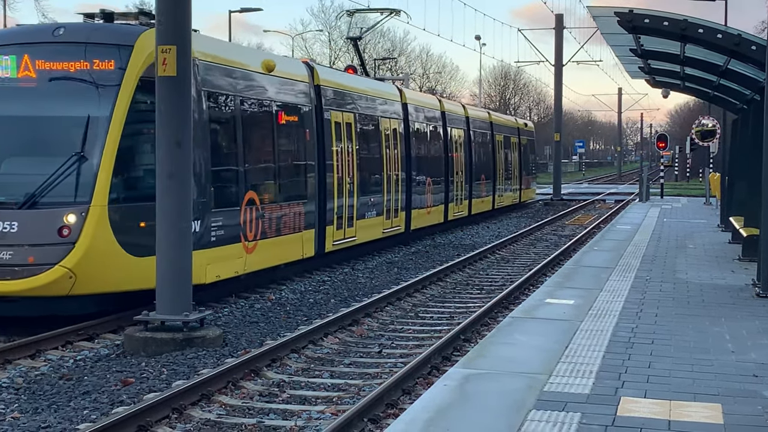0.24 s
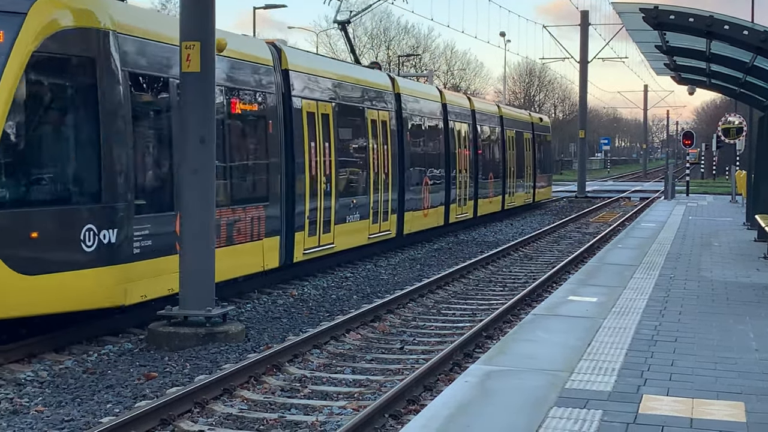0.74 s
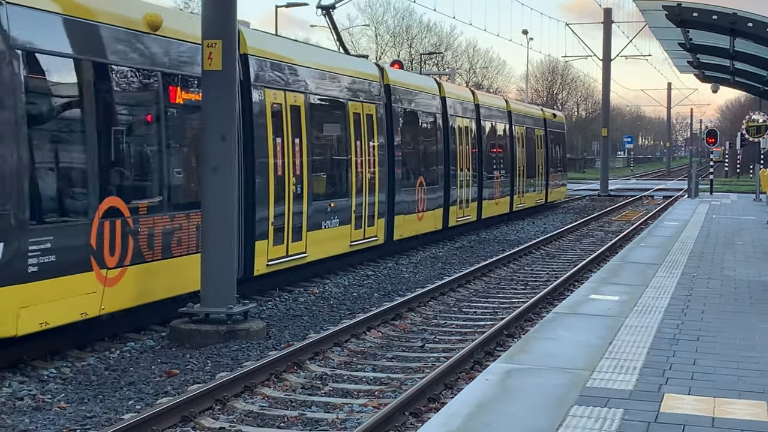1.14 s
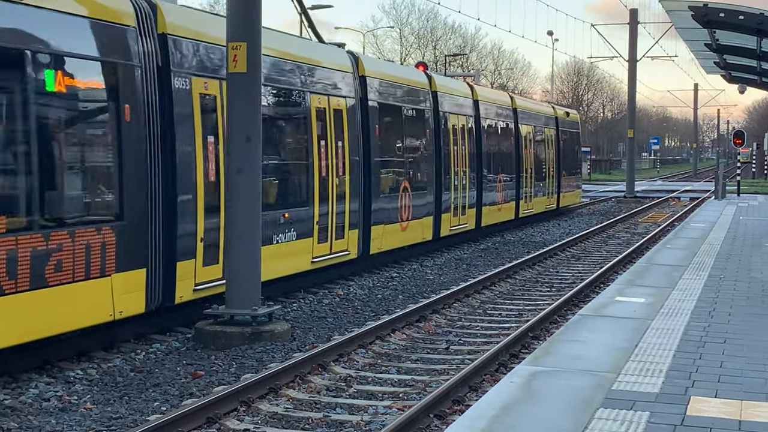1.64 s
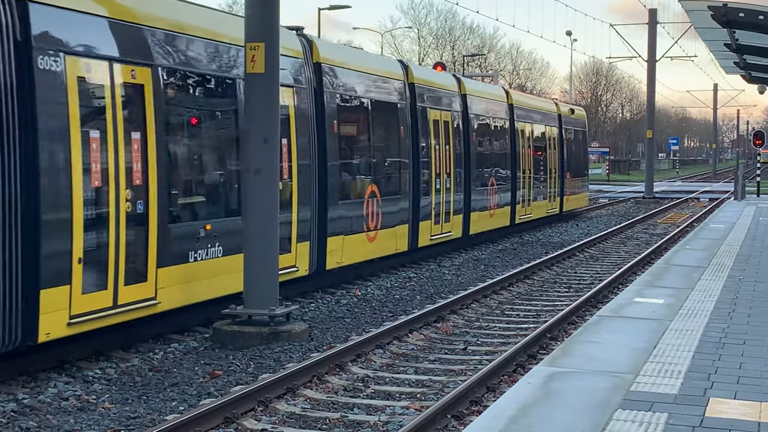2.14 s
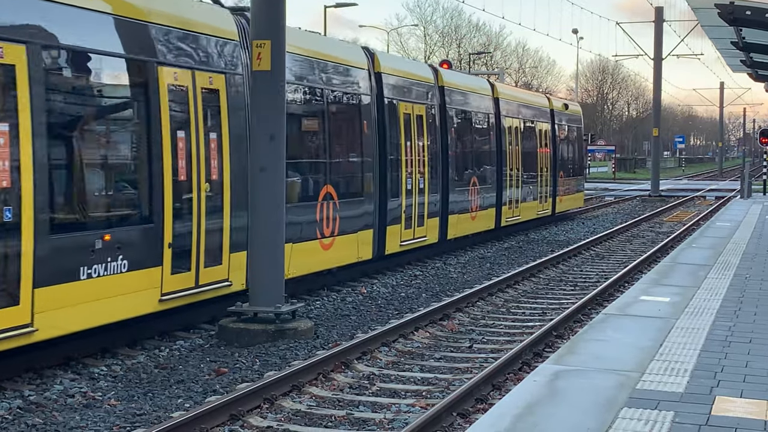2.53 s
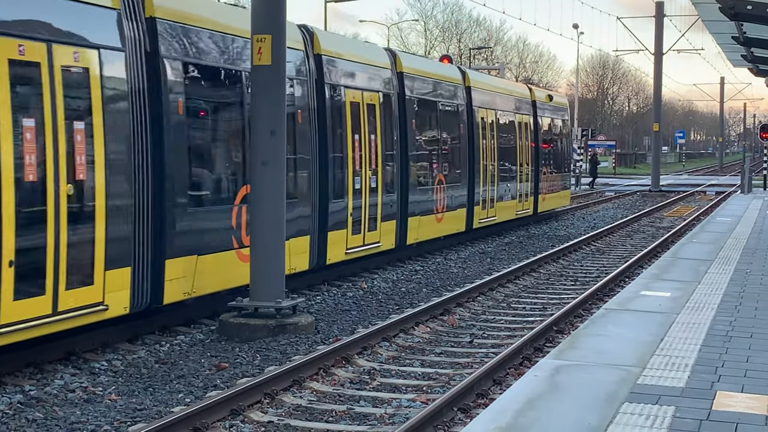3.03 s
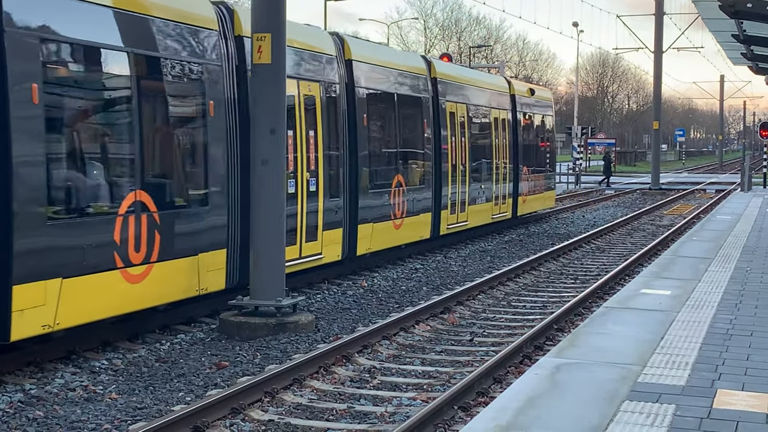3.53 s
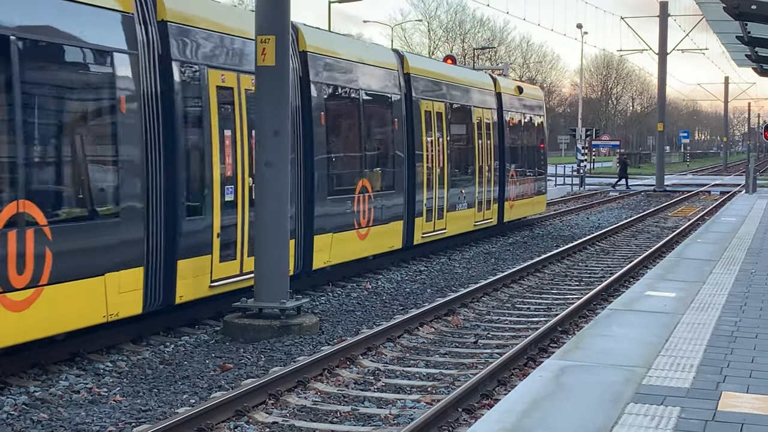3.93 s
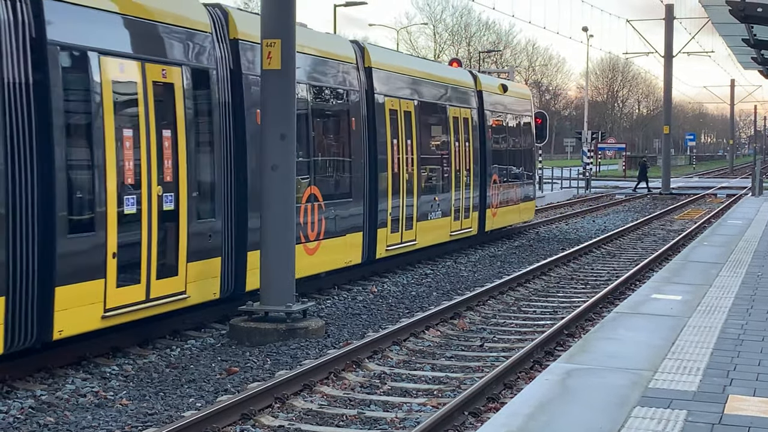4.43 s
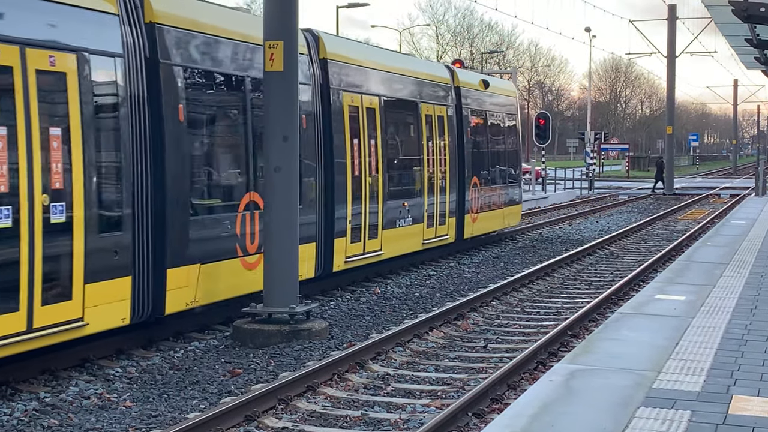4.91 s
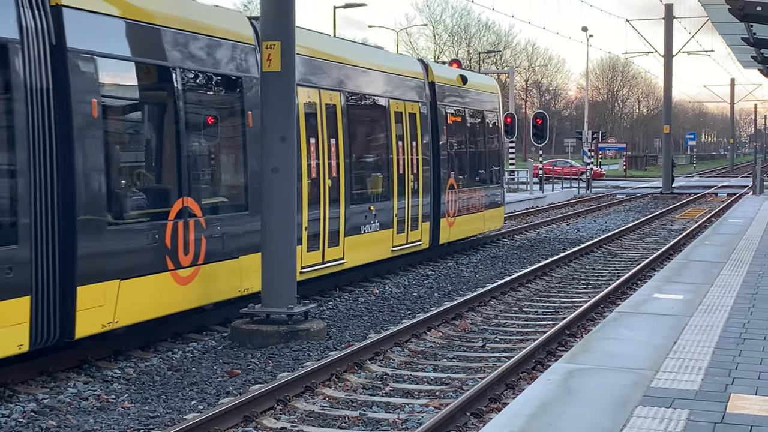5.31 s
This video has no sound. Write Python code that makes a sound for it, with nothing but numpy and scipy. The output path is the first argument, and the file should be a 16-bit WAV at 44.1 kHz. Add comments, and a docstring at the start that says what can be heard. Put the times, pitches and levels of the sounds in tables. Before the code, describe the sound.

Outdoors beside a tram stop, a close stereo phone microphone hears a tram roll past. Rumble and rail roar build with soft thuds and a rough electric whine. Around three seconds wheel knocks peak, with a faint flange squeal. Hiss and small ticks follow; the whine sags, gives way to a thinner, higher one, and a low hum comes forward.

```python
"""Slow tram past a platform

A tram rolls by, a few metres from a phone held level. Rough wheels shake ground, floor and rail as
coloured noise; bogies, brake levers and rail ring as struck modes. Motor inverters whine as smeared
tones and step up in pitch as the tram slows; gears hum, a flange sings, the brakes hiss and tick."""
import sys
import numpy as np
from scipy import signal
from scipy.fft import rfft, irfft
from scipy.io import wavfile
from scipy.ndimage import uniform_filter1d

SR = 44100
rng = np.random.default_rng(int(sys.argv[2]) if len(sys.argv) > 2 else 0)


def persist_wave(psi):
    """Save psi, clipped to +-1, as 16-bit WAV."""
    counts = np.round(np.clip(psi, -1, 1) * 32767).astype(np.int16)
    wavfile.write(sys.argv[1], SR, np.atleast_2d(counts).T)


N = 245194

# loudness of the passing bogies: time_s, bass_db, treble_db, top_hiss_db
PASS_BY = [(0, -15, -5.5, -10), (.3, -12.5, -5.5, -11), (1.0, -8, -2.5, -8), (1.45, -10, -2, -6.5),
           (2.1, -5.5, -1, -1), (2.65, -1, -.5, 0), (3.1, -2.5, -0.5, -0.5), (3.4, -1.5, -1, 3),
           (3.65, -4.5, -0.5, -1), (4.2, -2.5, -1.5, -4), (4.45, -4, -1, -8), (4.65, -5, -1.5, -12),
           (4.9, -8.5, -2, -9), (5.25, -4.5, -2.5, -6), (5.56, -5.5, -4, -7)]
# noise colours, relative density: freq_hz, density_db
GROUND_COLOUR = [(20, -30), (30, -18), (45, -5), (65, 1.5), (85, -0.5), (120, -29)]
BOOM_COLOUR = [(55, -9), (80, -8), (104, 9.5), (125, 5.5), (150, 1), (200, -2.5)]
RUMBLE_COLOUR = [(90, -71), (135, 0), (165, -0.5), (210, 3), (260, -5), (340, -16)]
DRONE_COLOUR = [(190, -7), (260, -1.5), (310, -0.5), (380, -1), (470, -15), (700, -36.5)]


def wheel_rumble():
    """Wheel roughness shakes ground, floor and running gear; thuds add power to ground and boom."""
    bass_db, _, _ = track(PASS_BY)
    boom_power, ground_power = thuds()
    ground_gain = np.sqrt(undb(-45) ** 2 + ground_power)
    boom_gain = np.sqrt(follow(-39, 0.53, bass_db) ** 2 + boom_power)
    ground = ground_gain * noise(GROUND_COLOUR, flicker_db=0.2, rate_hz=2.6)
    boom = boom_gain * noise(BOOM_COLOUR, flicker_db=0.82, rate_hz=15)
    rumble = follow(-33.5, 0.92, bass_db) * noise(RUMBLE_COLOUR, flicker_db=2.37, rate_hz=13)
    drone = follow(-35, 0.79, bass_db) * noise(DRONE_COLOUR, flicker_db=1.26, rate_hz=10)
    return ground + boom + rumble + drone


# soft thuds: peak_s, boom_db, ground_db
THUD_EVENTS = [(.2, -42, -55), (.63, -34, -45), (.86, -40.5, -33), (.98, -42, -35), (1.57, -37.5, -33),
               (1.68, -37, -40.5), (1.9, -46, -32), (1.99, -47, -35.5), (2.23, -34.5, -38.5),
               (2.66, -32.5, -57), (2.85, -55, -37.5), (3.06, -32.5, -38), (3.42, -30, -55),
               (3.82, -30.5, -54), (4.16, -33, -50), (4.28, -41, -52), (4.5, -34.5, -37.5),
               (4.679, -35, -34), (4.82, -56, -41), (5.02, -35.5, -34.5), (5.2, -36.5, -35.5),
               (5.45, -44, -44)]


def thuds():
    """Each thud swells and dies exponentially; returns floor boom power and ground shake power."""
    rise_s, fall_s = 0.058, 0.082  # amplitude time constants
    peak_s, *levels_db = np.transpose(THUD_EVENTS)[:, :, None]
    late_s = np.arange(N) / SR - peak_s
    decay = np.where(late_s < 0, -late_s / rise_s, late_s / fall_s)
    power = np.exp(-2 * decay)
    return [(undb(db) ** 2 * power).sum(axis=0) for db in levels_db]


# noise colours, relative density: freq_hz, density_db
ROAR_COLOUR = [(350, -19), (500, -3.5), (720, -7.5), (870, 2.5), (1050, -6.5), (1500, -8.5), (2000, -11.5),
               (2600, -26.5)]
SIZZLE_COLOUR = [(1300, -39), (2000, -0.5), (2700, -1), (3100, -2.5), (3300, -3.5), (3700, -4),
                 (4600, -10.5), (5500, -20.5)]


def rail_roar():
    """Wheel roughness shakes the rail: a midrange roar and a brighter sizzle."""
    _, treble_db, _ = track(PASS_BY)
    roar = follow(-42.5, 0.58, treble_db) * noise(ROAR_COLOUR, flicker_db=0.86, rate_hz=12)
    sizzle = follow(-48.5, 1, treble_db) * noise(SIZZLE_COLOUR, flicker_db=0.76, rate_hz=20)
    return roar + sizzle


def inverters():
    """The inverters whine, with a lower side band; later a higher, tidier pair joins."""
    return fast_whine() + lower_side_band() + creep_whine()


# inverters at speed: time_s, nominal_hz, level_db, octave_db, skirt_db
WHINE_TRACK = [(0.0, 2008, -51, -63, -3), (0.45, 2051, -51.5, -65.5, -4.5), (0.71, 2043, -47, -60, -2.5),
               (1.02, 2001, -46.5, -61.5, -3), (1.3, 2056, -47.5, -63, -5), (1.5, 2060, -45, -63, -7),
               (1.64, 2053, -45, -59, -7), (1.7, 2045, -54, -58.5, -9), (1.8, 2042, -46, -57, -10.5),
               (1.9, 2058, -49, -56, -7), (2.08, 2006, -49, -53, -9), (2.25, 2024, -49, -52, -5),
               (2.5, 1973, -43, -50, -1), (2.76, 2027, -41, -52.5, -6.5), (2.96, 2045, -44.5, -53, -2.5),
               (3.14, 2016, -41.5, -50.5, -3), (3.34, 2051, -42.5, -52.5, -4.5),
               (3.58, 2040, -39.5, -52.5, -5.5), (3.72, 2048, -45.5, -57, -5), (3.82, 2035, -40, -55, -5.5),
               (3.95, 1993, -47, -52.5, -4), (4.1, 1983, -45, -54.5, 1), (4.4, 1928, -43.5, -56, -4),
               (4.52, 1905, -43.5, -55.5, 0.5), (4.62, 2014, -52, -67, -2), (5.56, 2052, -54, -72, -3)]


def fast_whine():
    """A ragged core between side bands, with a blurred octave."""
    hz, level_db, octave_db, skirt_db = track(WHINE_TRACK)
    skirt = wavering(.97 * hz, 325) + undb(-3.0) * wavering(1.11 * hz, 320)
    core_hz = hz * (1.01 + .004 * walk(18))
    core = undb(1.2 * walk(25)) * wavering(core_hz, 72, steady=.55)
    base = undb(-8.0 - skirt_db) * core + undb(skirt_db - 4.0) * skirt
    octave = undb(-1.0) * wavering(1.98 * hz, 700)
    for ratio in (1.9, 1.97, 2.06):
        strand_hz = hz * (ratio + .022 * walk(22))
        octave = octave + undb(-6 + 1.5 * walk(20)) * wavering(strand_hz, 130, steady=.2)
    base_gain = undb(level_db + 0.48 * walk(15))
    octave_gain = undb(octave_db - 0.9 + 0.67 * walk(25.1))
    return base_gain * base + octave_gain * octave


# lower side band of the whine: time_s, nominal_hz, level_db
LOW_WHINE_TRACK = [(0.0, 1850, -55), (0.62, 1825, -63), (0.96, 1840, -54), (1.56, 1856, -54),
                   (1.59, 1870, -48.5), (2.01, 1860, -55), (2.46, 1857, -48.5), (2.48, 1849, -45.5),
                   (3.45, 1871, -50), (3.51, 1799, -38), (3.59, 1895, -54), (3.63, 1867, -43),
                   (3.67, 1838, -49), (4.37, 1862, -46.5), (4.41, 1847, -41), (4.62, 1880, -59)]


def lower_side_band():
    """A lower side band, wandering in pitch and level until its track ends."""
    hz, level_db = track(LOW_WHINE_TRACK)
    gain = undb(level_db - 3.0 + 2.0 * walk(14))
    tone = wavering(hz * (1 + .012 * walk(10)), 108)
    return gain * tone * (np.arange(N) / SR < LOW_WHINE_TRACK[-1][0])


# inverters when slow: time_s, base_db, octave_db
CREEP_TRACK = [(4.5, -57, -72), (4.62, -54.5, -69), (4.76, -58, -69), (4.92, -57.5, -66.5),
               (5.1, -55.5, -62), (5.22, -62, -63), (5.38, -57, -60), (5.45, -58, -58), (5.56, -66, -66)]


def creep_whine():
    """Slow-speed switching near 3 kHz and its octave, from the start of the track."""
    base_db, octave_db = track(CREEP_TRACK)
    hz = 3016 * (1 + .003 * walk(25))
    sway = 1 + .006 * walk(14)
    base = undb(base_db + 1.2 * walk(16)) * wavering(hz * sway, 100, steady=.4)
    octave = undb(octave_db) * wavering(2 * hz, 120, steady=.5)
    return (base + octave) * (np.arange(N) / SR > CREEP_TRACK[0][0])


# wheel knocks: start_s, peak_db
KNOCK_EVENTS = [(.347, -28.5), (.942, -34), (.977, -29.5), (1.537, -26.5), (1.927, -34), (2.632, -22),
                (2.657, -26.5), (2.915, -22), (3.013, -24), (3.0195, -12), (3.17, -24), (3.335, -27),
                (3.402, -22), (3.78, -28), (4.15, -31)]
# bogie modes: freq_hz, level_db, t60_s
BOGIE_MODES = [(115, -9, .08), (168, -2, .085), (195, -3, .085), (255, -12, .04), (320, -1, .07),
               (360, 2, .075), (450, -8, .05), (540, -12, .04), (640, -19, .03)]


def wheel_knocks():
    """Wheel blows ring the low modes of the bogie."""
    return strike(KNOCK_EVENTS, BOGIE_MODES, push_s=0.00388, spread=.04)


# gear hum: time_s, pitch_hz, level_db
HUM_TRACK = [(0, 224, -52), (1.5, 222, -51), (2.5, 221, -53), (4.66, 220, -53), (4.75, 220, -39.5),
             (5.1, 219, -38.5), (5.56, 218, -39)]


def gears():
    """The gear mesh hums, nearly a pure tone."""
    hz, level_db = track(HUM_TRACK)
    return undb(level_db) * wavering(hz, 7, steady=3.5)


# metal ticks: start_s, peak_db
TICK_EVENTS = [(3.205, -45), (3.306, -55), (3.349, -40), (3.377, -41), (3.596, -49), (3.608, -40),
               (3.644, -47), (3.747, -40), (3.905, -47), (3.953, -50), (4.004, -51), (4.011, -44),
               (4.103, -41), (4.113, -48), (4.208, -43), (4.221, -42), (4.432, -45), (4.533, -46),
               (5.0415, -33), (5.045, -46), (5.0485, -41), (5.052, -38), (5.0545, -39), (5.065, -47),
               (5.077, -47), (5.08, -46), (5.0835, -36), (5.0865, -39), (5.09, -38), (5.098, -45),
               (5.104, -47), (5.412, -43)]
# brake lever modes: freq_hz, level_db, t60_s
LEVER_MODES = [(4400, -11, .016), (5100, -12, .012), (5900, -4, .018), (6500, 0, .022), (7000, -2, .018),
               (7500, -2, .018), (8000, -2, .018), (8500, -1, .02), (9200, -8, .012), (10000, -13, .01),
               (10800, -15, .01), (11700, -15, .01), (12800, -13, .01), (13700, -13, .01)]


def brake_ticks():
    """Short blows ring the bright, quickly damped modes of a brake lever."""
    return strike(TICK_EVENTS, LEVER_MODES, push_s=0.000466, spread=0.053)


# rail pings: start_s, peak_db
PING_EVENTS = [(4.5125, -32.5)]
# rail modes: freq_hz, level_db, t60_s
RAIL_MODES = [(2750, -4, .02), (2980, -1, .018), (3160, 0, .02), (3400, -8, .012), (6150, -13, .015),
              (6500, -14, .012), (7400, -18, .01)]


def rail_pings():
    """A sharp blow rings the rail."""
    return strike(PING_EVENTS, RAIL_MODES, push_s=0.000488, spread=0.01)


# clacks under the floor: start_s, peak_db
CLACK_EVENTS = [(.222, -42), (.555, -42), (3.025, -36), (4.535, -42), (5.052, -45), (5.083, -43),
                (5.089, -45), (5.412, -44)]
# linkage modes: freq_hz, level_db, t60_s
LINKAGE_MODES = [(2200, -4, .012), (2600, -2, .012), (3000, 0, .012), (3400, -2, .012), (3800, -3, .011),
                 (4200, -4, .011), (4700, -4, .01), (5300, -6, .01)]


def floor_clacks():
    """Longer pushes ring the linkage, duller than the ticks."""
    return strike(CLACK_EVENTS, LINKAGE_MODES, push_s=0.003, spread=0.071)


# flange squeal that dips, arcs up and sinks: time_s, pitch_hz, level_db
FLANGE_TRACK = [(2.7, 3150, -70), (2.76, 3160, -56), (2.81, 3080, -60), (2.86, 3110, -53.5),
                (2.9, 3200, -55.5), (2.94, 3180, -55.5), (3.0, 3140, -59), (3.09, 3120, -61),
                (3.15, 3110, -75)]


def flange():
    """One wheel flange sings against the rail for a moment."""
    hz, level_db = track(FLANGE_TRACK)
    t = np.arange(N) / SR
    sounding = (t > FLANGE_TRACK[0][0]) & (t < FLANGE_TRACK[-1][0])
    return undb(level_db) * wavering(hz, 45, steady=1.) * sounding


# squeals, whistles, low surges, rough whine strands:
# start_s, end_s, from_hz, to_hz, blur_hz, level_db, left_minus_right_db, left_lead_ms
GLIDE_EVENTS = [(0, 2.3, 6850, 6800, 150, -71, 0, .47), (1.1, 1.3, 680, 665, 25, -47.5, 6, .6),
                (2.3, 3.5, 548, 518, 14, -52, 0, .47), (2.4, 4.4, 6500, 6460, 90, -73, 0, .47),
                (2.7, 4.4, 10100, 10080, 90, -78, 0, .4), (1.05, 1.62, 2190, 2270, 220, -51, 0, .4),
                (2.3, 2.62, 2640, 2780, 200, -56, 0, .35), (2.64, 2.9, 2700, 2860, 170, -56, 0, .35),
                (3.38, 3.47, 108, 104, 6, -31, -1, .47), (3.79, 3.9, 98, 116, 6, -32, -1, .47),
                (4.11, 4.22, 108, 90, 6, -30, -1, .47), (4.5, 4.62, 2760, 2860, 90, -56, 0, .35),
                (4.7, 4.86, 2640, 2680, 90, -58, 0, .35), (2.9, 3.9, 10550, 10540, 30, -80, 0, .38),
                (3.14, 3.32, 700, 695, 12, -50, 3, .6), (3.68, 3.83, 1180, 990, 12, -51, -10, .47),
                (4.3, 4.42, 585, 575, 16, -51, 0, .6), (4.48, 4.59, 205, 210, 12, -35, 0, .47),
                (4.55, 4.74, 345, 315, 50, -36, 0, .5), (4.83, 5.12, 540, 520, 14, -48.5, -3, .6)]


def squeals_and_surges():
    """Thin tones and blurred bands glide, swell and fade, each with its own port balance and lag."""
    clear_hz = 15  # blur at which steady and smeared shares are equal
    out = np.zeros((2, N))
    for start_s, end_s, from_hz, to_hz, blur_hz, level_db, pan_db, lead_ms in GLIDE_EVENTS:
        i, j = int(start_s * SR), int(end_s * SR)
        way = np.linspace(0, 1, j - i)
        hz = from_hz + (to_hz - from_hz) * way
        tone = wavering(hz, blur_hz, steady=clear_hz / blur_hz)[0]
        tone = np.sqrt(np.sin(np.pi * way).clip(0)) * tone
        pair = np.array([tone, np.roll(tone, round(lead_ms * SR / 1000))])
        side_db = np.array([[pan_db], [-pan_db]]) / 2
        out[:, i:j] += undb(level_db + side_db) * pair
    return out


# noise colours, relative density: freq_hz, density_db
HISS_COLOUR = [(4000, -4), (4800, -2), (5500, -0.5), (6700, 1.5), (7900, 1.5), (8800, -6.5), (10200, -6.5),
               (11500, -21), (12800, -14)]
TOP_HISS_COLOUR = [(10500, 1), (11800, -5), (13000, 3), (13700, -8), (14300, 0)]


def brake_air():
    """Air leaks from the brakes: a flickering hiss with a thin top."""
    _, treble_db, top_db = track(PASS_BY)
    hiss = follow(-58, 1.32, treble_db) * noise(HISS_COLOUR, flicker_db=0.86, rate_hz=25.35)
    top = undb(-69 + top_db) * noise(TOP_HISS_COLOUR, flicker_db=1.2, rate_hz=16)
    return hiss + top


def undb(db):
    """Decibels to amplitude."""
    return 10 ** (np.asarray(db) / 20)


def unit(x):
    """Scale to rms 1."""
    return x / np.sqrt(np.mean(np.abs(x) ** 2))


def track(table):
    """Columns of a curve at every sample."""
    s, *columns = np.transpose(table)
    return [np.interp(np.arange(N) / SR, s, column) for column in columns]


def follow(level_db, share, rise_db):
    """Gain of a layer that follows a share of a rise."""
    return undb(level_db + share * rise_db)


def walk(rate_hz):
    """Random levels held 1 / rate_hz and slewed twice; spread near 1."""
    k = int(SR / rate_hz)
    held = np.repeat(rng.standard_normal(N // k + 1), k)
    return 1.8 * uniform_filter1d(uniform_filter1d(held, k), k)[:N]


def along(hz, values):
    """Values on a log frequency axis, read at every bin."""
    return np.interp(np.log(np.fft.rfftfreq(N, 1 / SR) + 1), np.log(hz), values)


def noise(colour, flicker_db, rate_hz):
    """Two unrelated noises of one colour whose levels flicker together."""
    hz, db = np.transpose(colour)
    bin_hz = np.fft.rfftfreq(N, 1 / SR)
    shape = undb(along(hz, db)) * (bin_hz > hz[0]) * (bin_hz < hz[-1])
    coloured = irfft(rfft(rng.standard_normal((2, N))) * shape, N)
    return unit(coloured * undb(flicker_db * walk(rate_hz)))


def wavering(hz, width_hz, steady=0):
    """Two tones on one pitch track, each smeared by its own chance, beside a steady share."""
    chance = rng.standard_normal((2, len(hz))) + 1j * rng.standard_normal((2, len(hz)))
    lowpass = signal.butter(2, width_hz / 2, fs=SR, output="sos")
    slow = unit(signal.sosfilt(lowpass, chance))
    carrier = np.exp(2j * np.pi * np.cumsum(hz) / SR)
    return unit(((steady + slow) * carrier).real)


def strike(events, modes, push_s, spread):
    """Each blow pushes for a moment and rings the modes, a little differently every time."""
    out = np.zeros(N + SR)
    t = np.arange(SR // 4) / SR
    hz, db, t60_s = np.transpose(modes)[:, :, None]
    for start_s, peak_db in events:
        level_chance, pitch_chance = rng.standard_normal((2, len(modes), 1))
        mode_hz = hz * (1 + spread * pitch_chance)
        tones = -np.sin(2 * np.pi * mode_hz * (t - 2 * push_s))
        ring = undb(db + 0.49 * level_chance) * tones * 1000 ** (-t / t60_s)
        ring = ring.sum(axis=0) * (1 - np.exp(-t / push_s)) ** 2
        i = int(start_s * SR)
        out[i:i + len(t)] += undb(peak_db) * ring / np.abs(ring).max()
    return out[:N]


# two microphone ports: freq_hz, likeness_0_to_1, left_minus_right_db
PORT_CURVES = [(40, 0.79, -1.5), (139, 0.98, -1), (352, 1, .5), (660, 0.83, 4.5), (1070, 0.39, 2.5),
               (2190, 0.46, 2), (3940, 0.3, 1.5), (6500, 0.08, -2.5), (9340, 0.97, 1.5), (12100, 1, -0.5)]
# phase by which left leads right: freq_hz, lead_rad
LEFT_LEAD_CURVE = [(0, 0.1), (950, 2.3), (3270, 9.4), (6500, 19.4), (8650, 22), (11700, 28.3),
                   (13300, 31.4), (15000, 34.8)]


def scene():
    """Each port hears the direct sound with its own phase; the right also hears it scattered."""
    rolling = wheel_rumble() + rail_roar() + brake_air()
    blows = wheel_knocks() + brake_ticks() + floor_clacks() + rail_pings()
    tram = rolling + inverters() + gears() + flange() + blows
    soft_ends = signal.windows.tukey(N, 1 / 1000)
    direct, scattered = rfft(tram * soft_ends)
    hz, like, pan_db = np.transpose(PORT_CURVES)
    like = np.clip(along(hz, like), 0, 1)
    gain = undb(along(hz, pan_db) / 2)
    lead_rad = np.interp(np.fft.rfftfreq(N, 1 / SR), *np.transpose(LEFT_LEAD_CURVE))
    right = like * np.exp(-1j * lead_rad) * direct + np.sqrt(1 - like ** 2) * scattered
    # 1.5 dB and the port gains change all layers but the squeals and surges
    return undb(1.5) * irfft(np.array([direct * gain, right / gain]), N) + squeals_and_surges()


def record(dry):
    """The top ends: a steep elliptic low-pass at 14280 Hz."""
    lowpass = signal.ellip(14, .3, 70, 14280, fs=SR, output="sos")  # ripple, stop band in dB
    return signal.sosfilt(lowpass, dry)


dry = scene()
out = record(dry)
persist_wave(out)
```